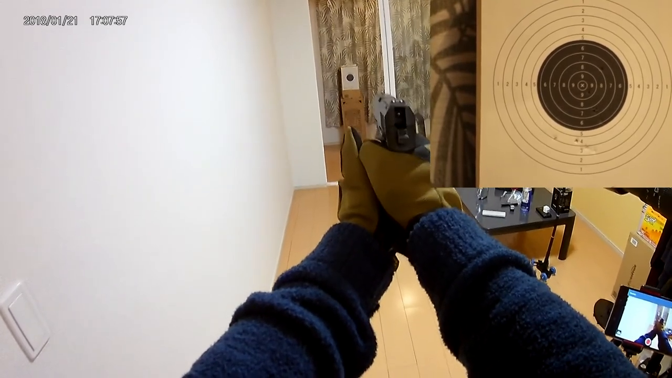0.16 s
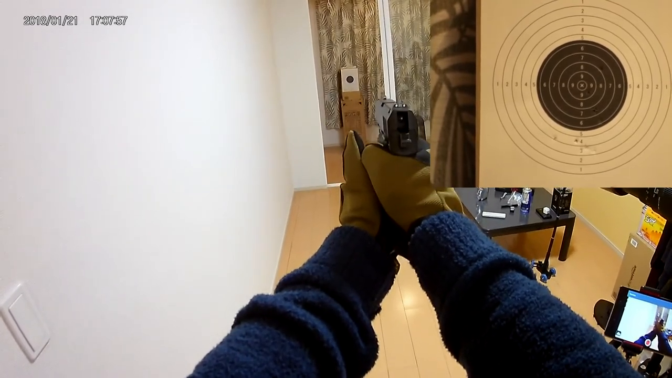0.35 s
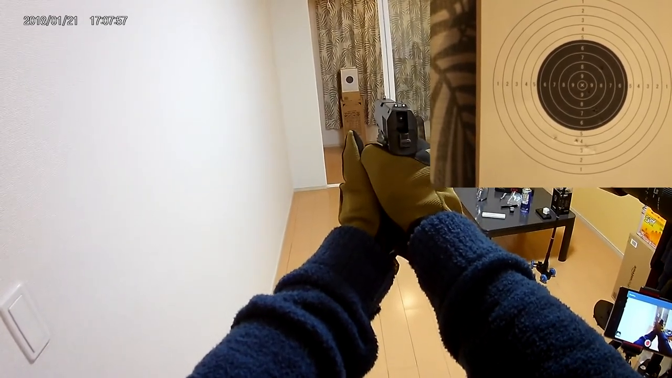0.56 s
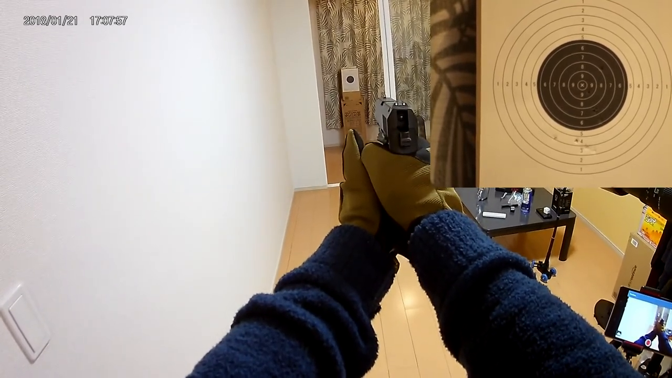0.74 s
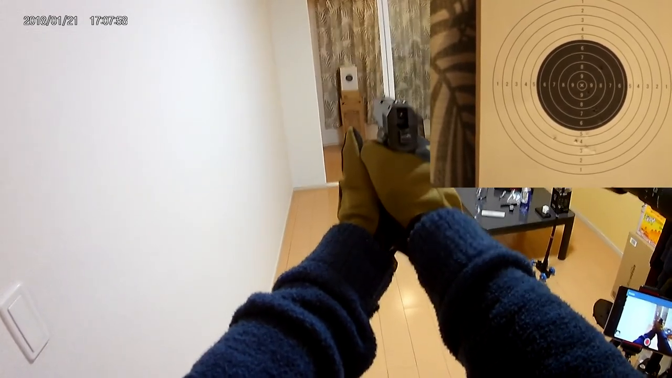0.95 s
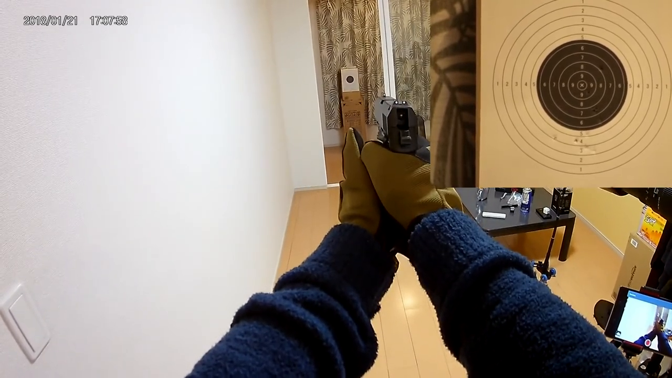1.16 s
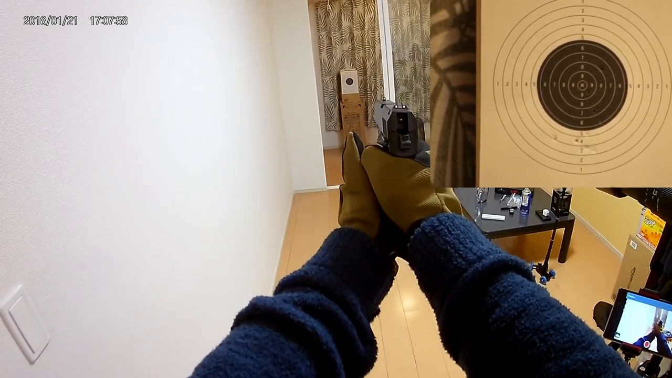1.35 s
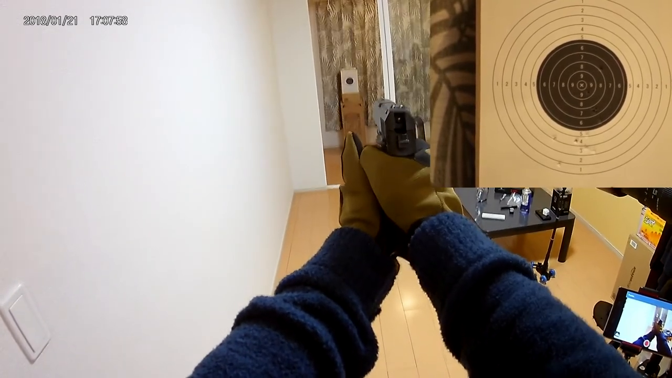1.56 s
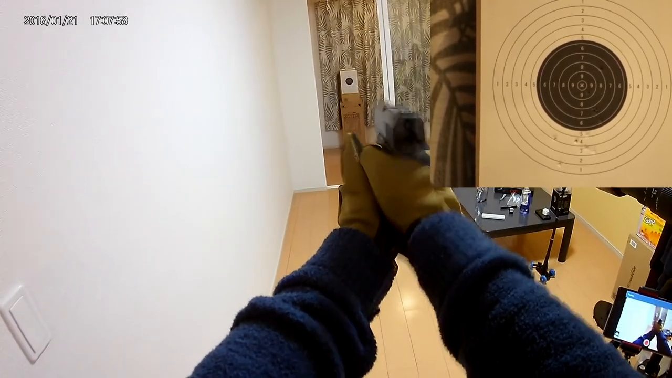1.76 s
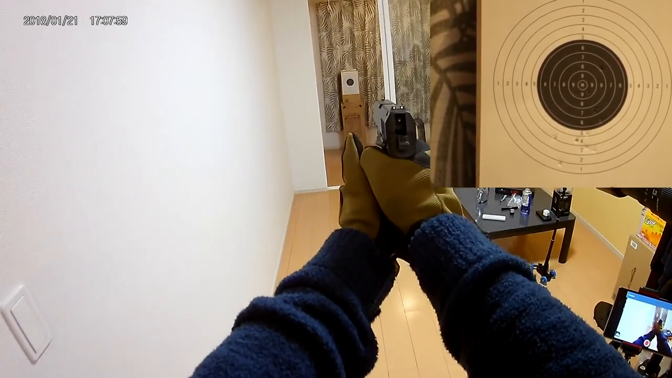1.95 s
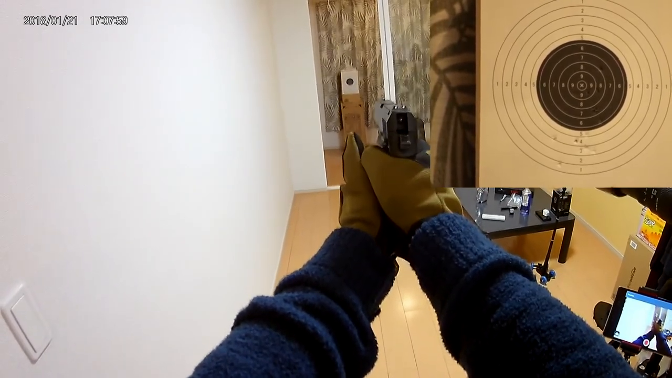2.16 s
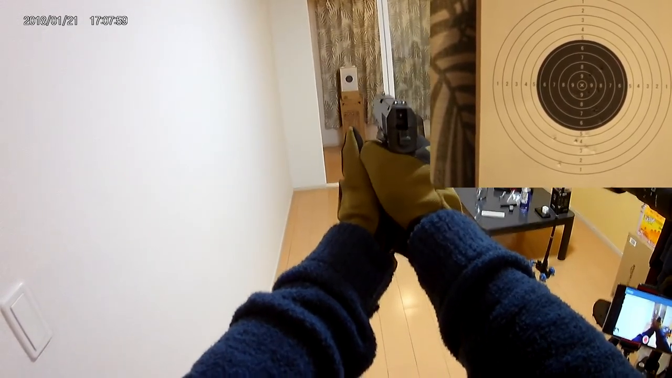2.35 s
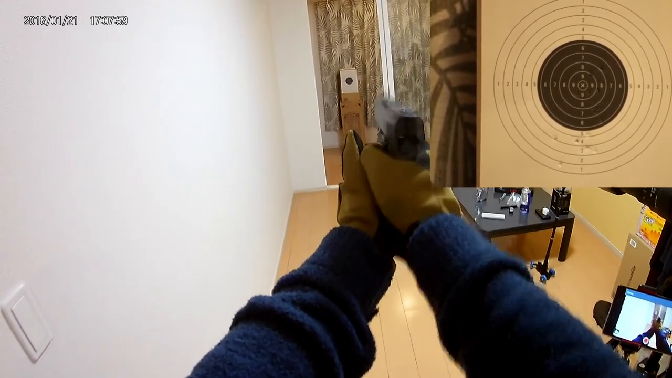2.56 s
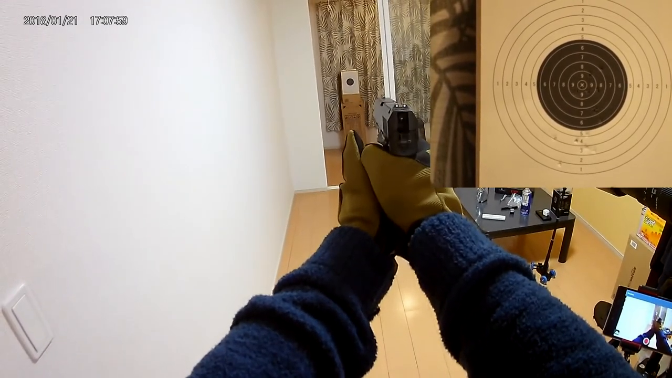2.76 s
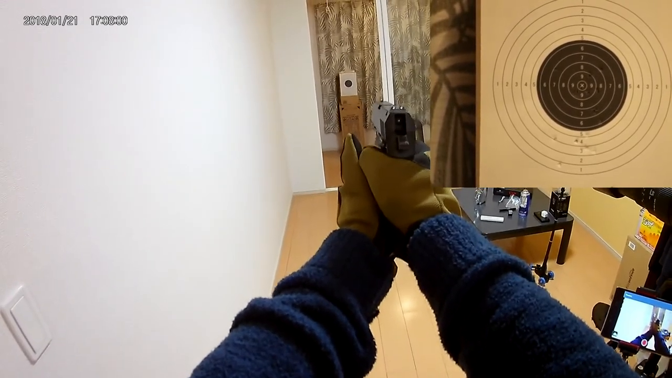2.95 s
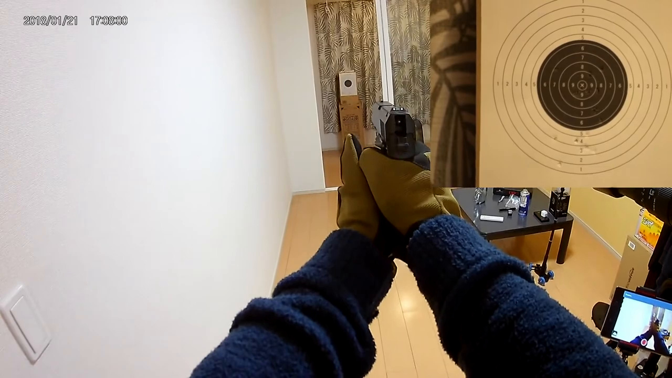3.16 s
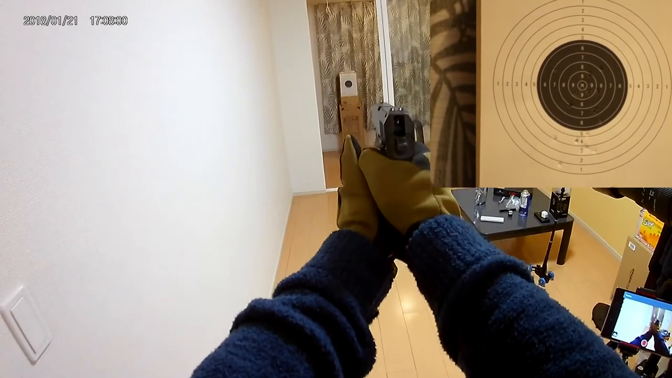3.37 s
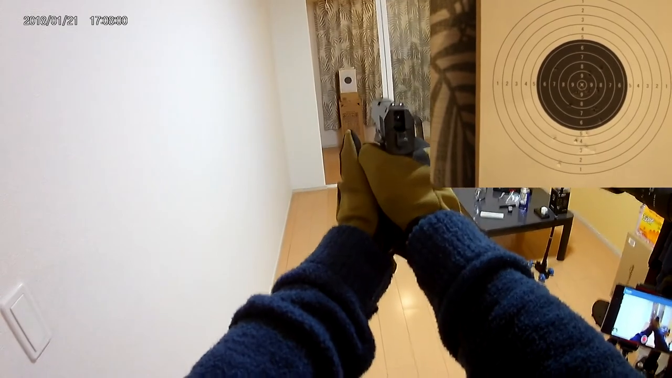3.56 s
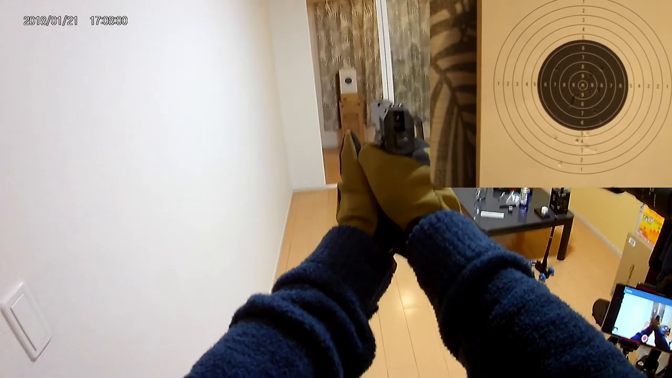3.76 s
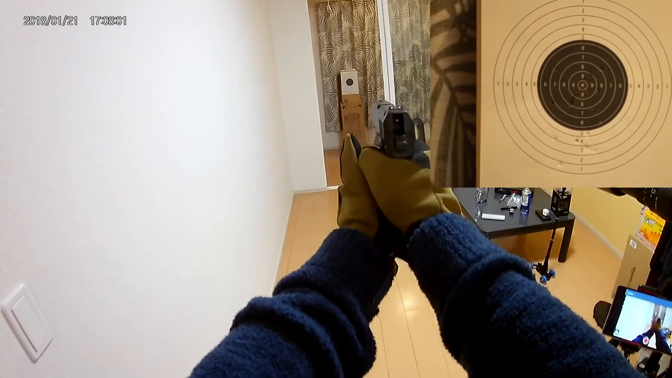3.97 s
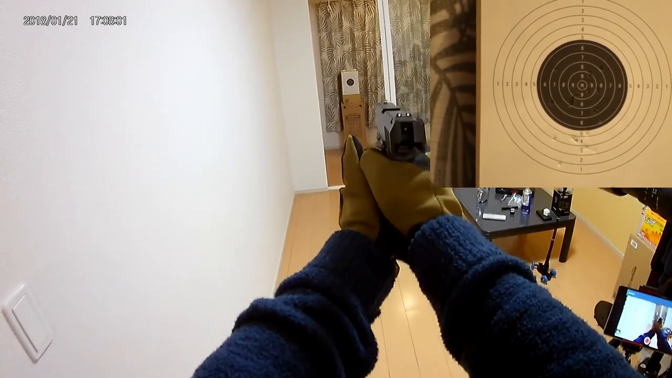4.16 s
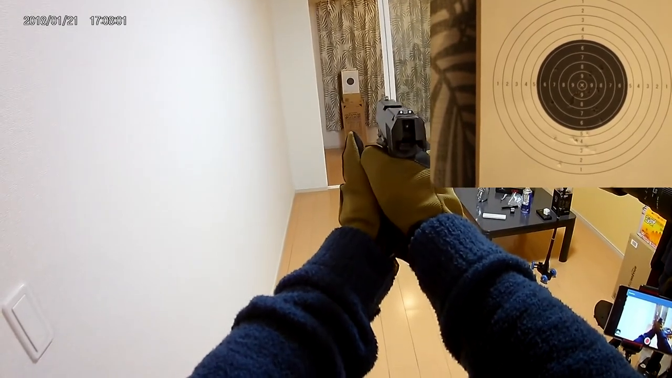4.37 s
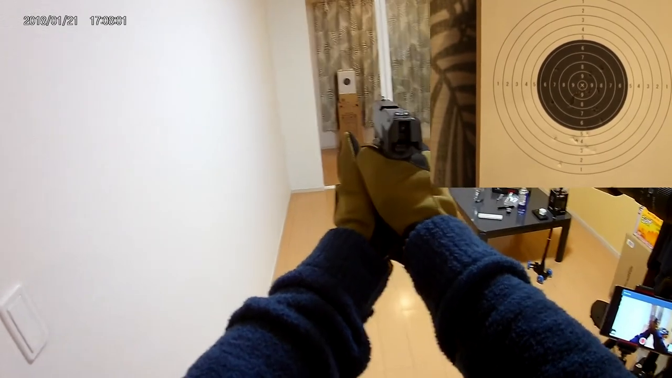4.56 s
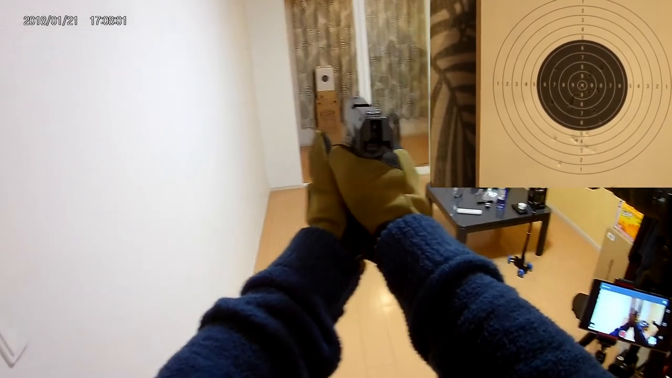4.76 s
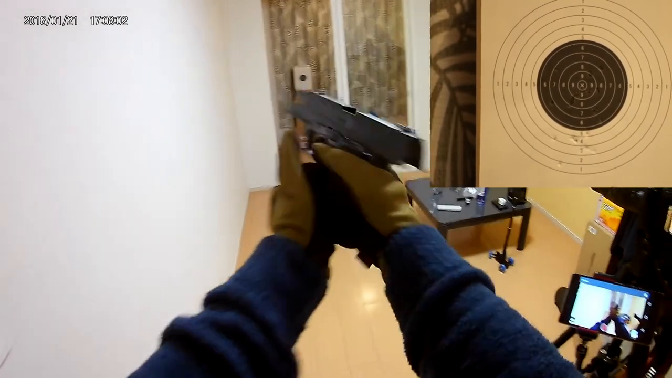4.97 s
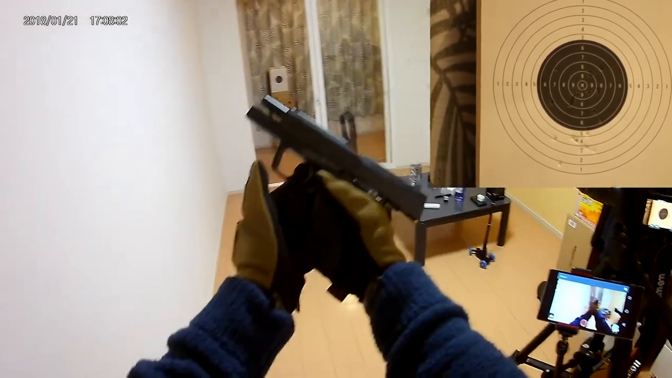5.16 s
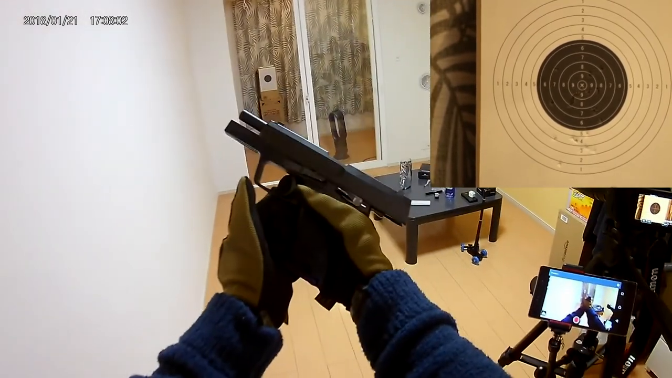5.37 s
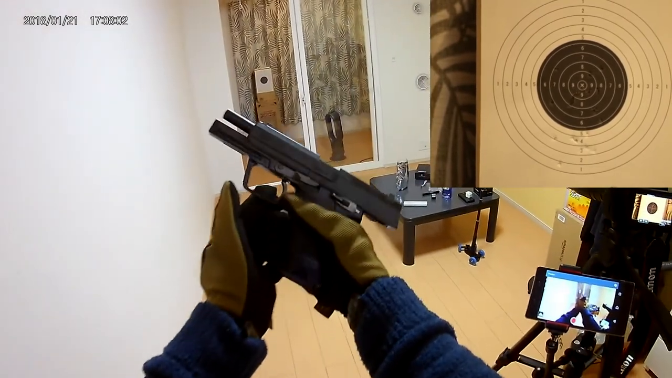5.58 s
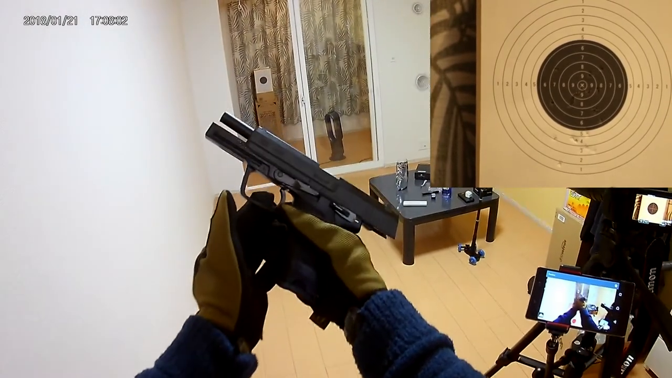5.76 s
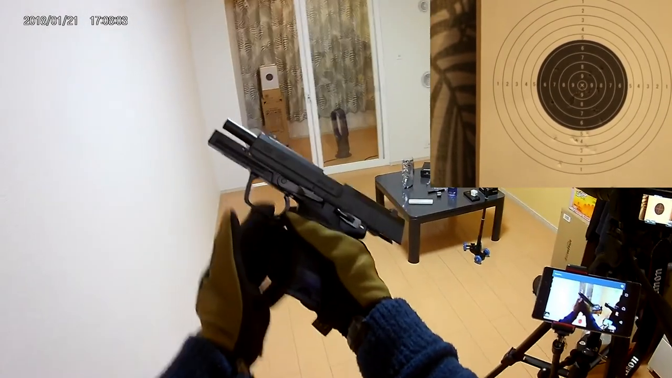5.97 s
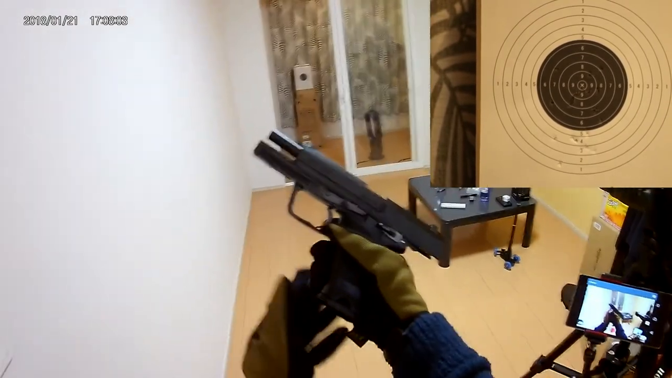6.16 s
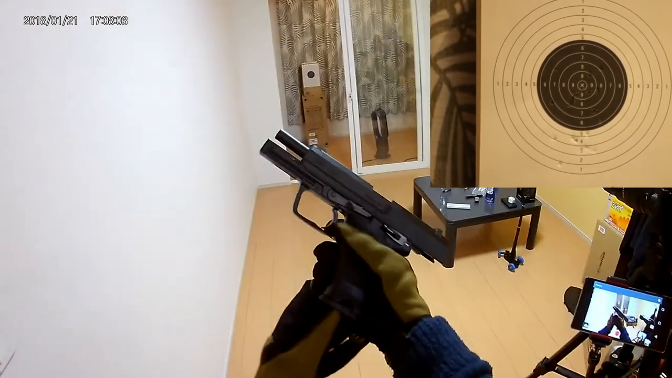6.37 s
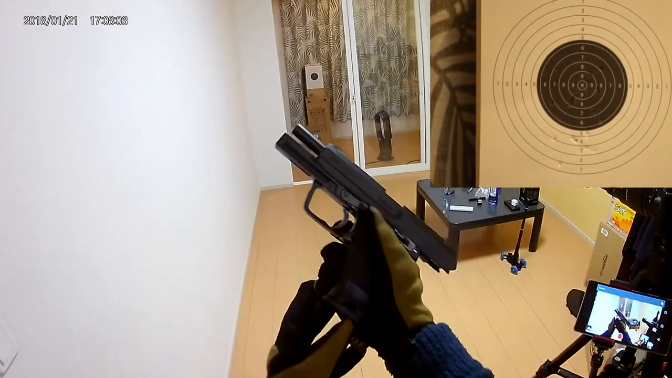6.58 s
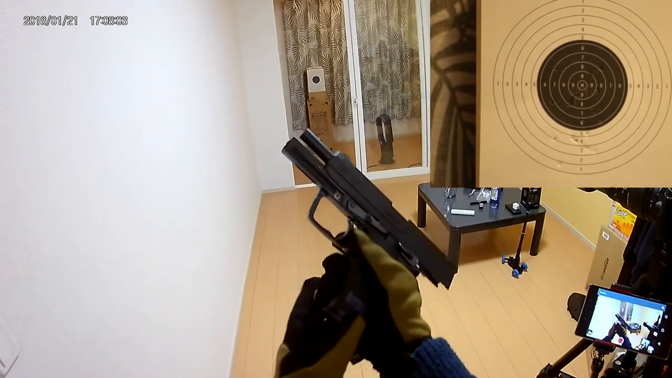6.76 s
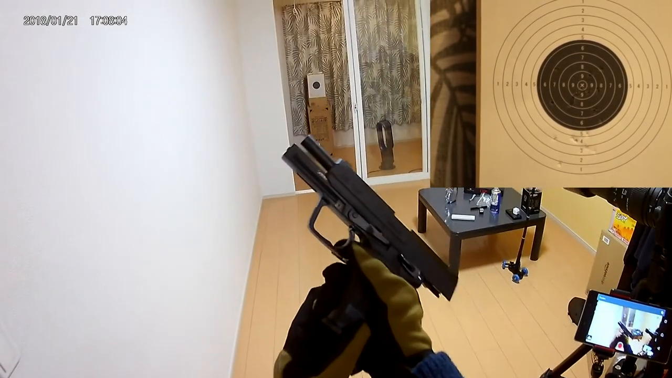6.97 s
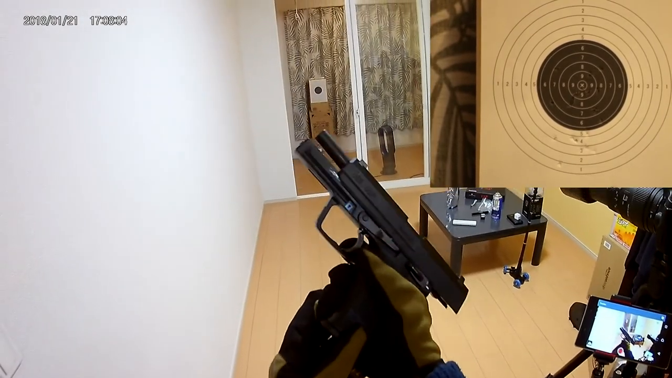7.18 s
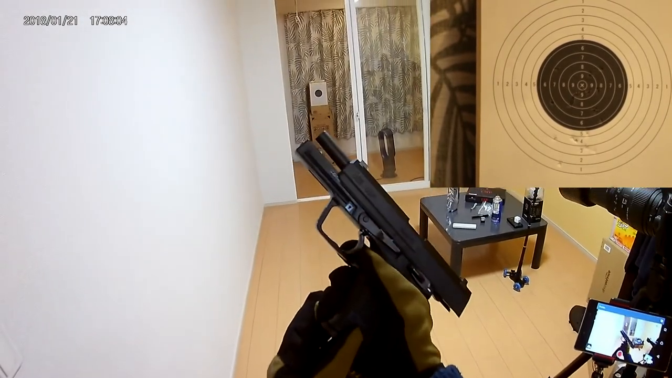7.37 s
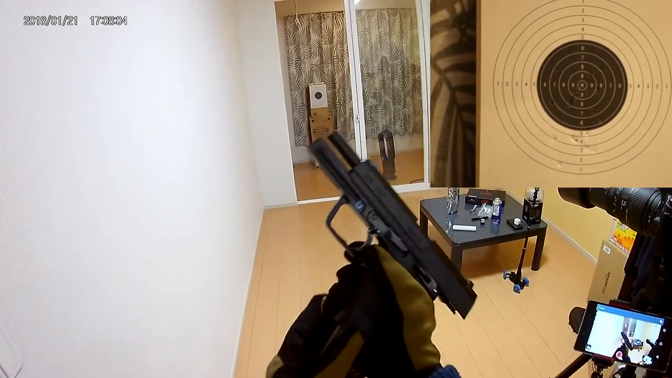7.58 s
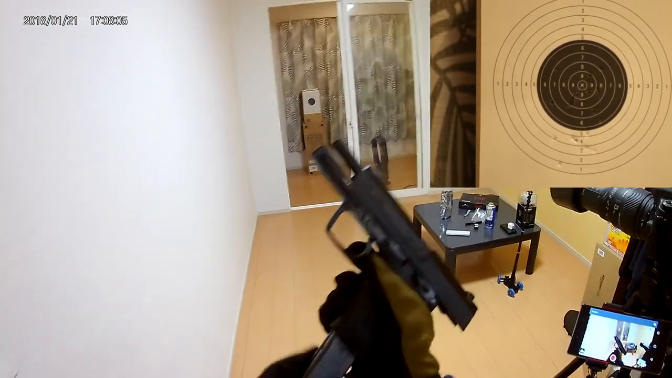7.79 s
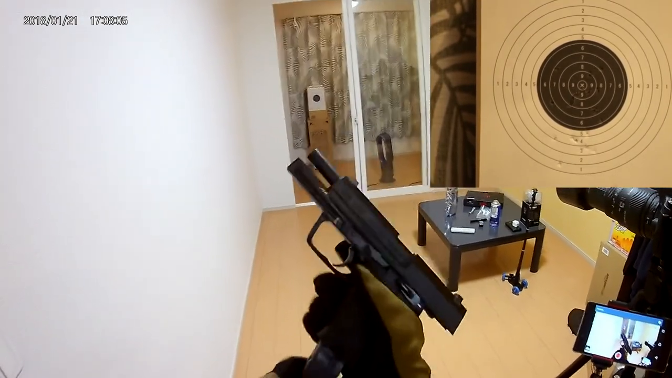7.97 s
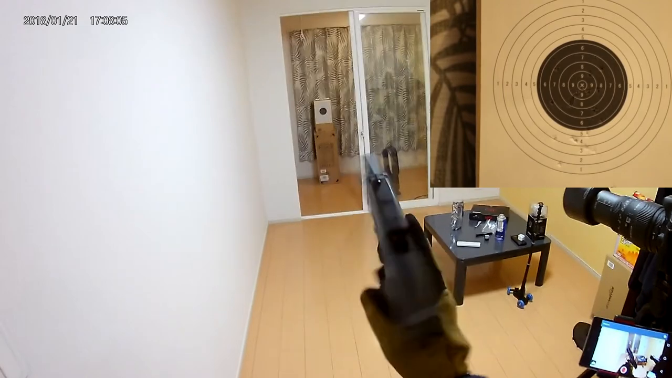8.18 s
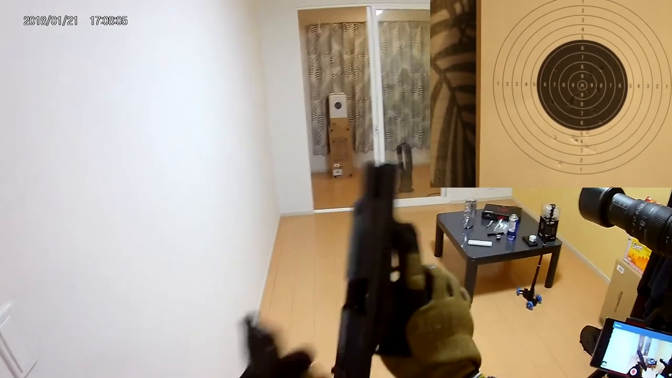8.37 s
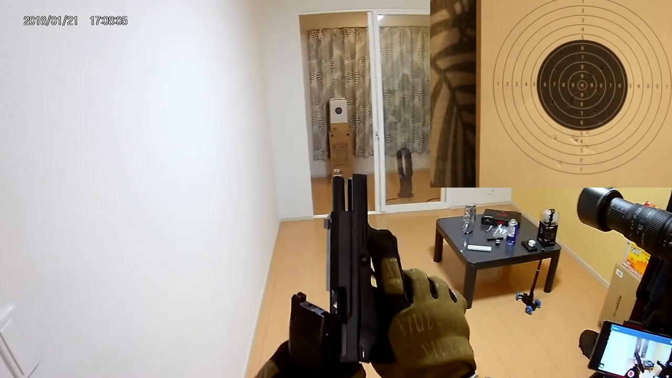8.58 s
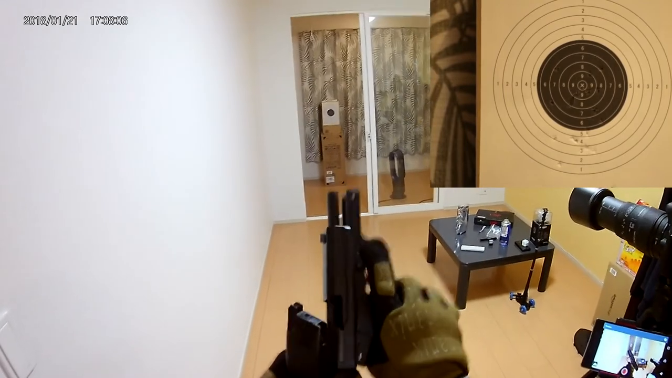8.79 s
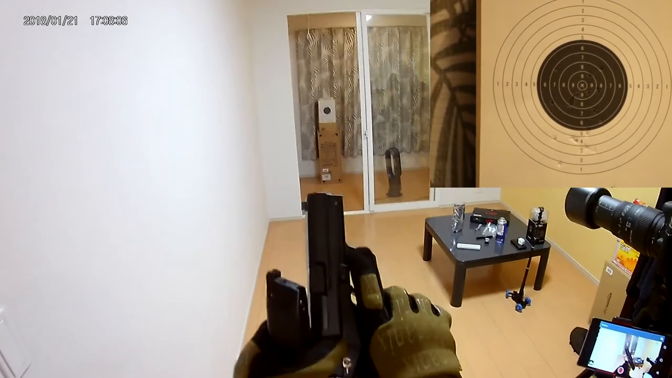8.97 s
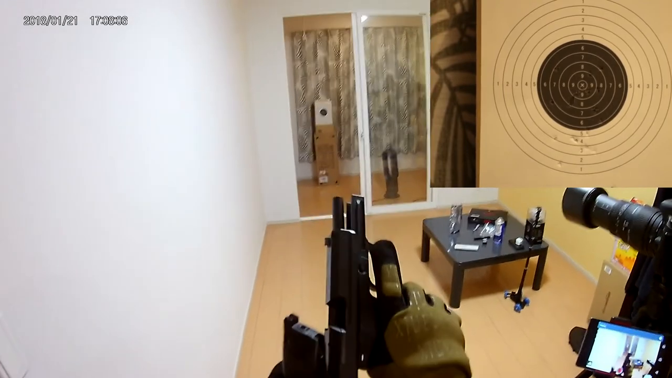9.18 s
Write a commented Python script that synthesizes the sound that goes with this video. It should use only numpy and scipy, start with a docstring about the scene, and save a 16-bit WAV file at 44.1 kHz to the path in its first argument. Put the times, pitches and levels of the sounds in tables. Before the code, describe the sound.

A gas airsoft pistol is fired close to a head-worn stereo microphone in a small, bare, reverberant room. The tail of a shot opens the sound; others crack at 0.2 and 0.9 s, with faint knocks and clicks between. From 1.6 to 4.2 s, eleven more follow quickly, roughly every quarter to third of a second. Each is a hard, bright gas burst with a low thump, double metallic slide clack, brief ring and boxy pellet smack; the box rattles around 1.7 s. The last slide stroke is softer. Reverberation fades to quiet air, hum and whir, with a click at 4.5 s. From 5.1 to 8.6 s come gentle glove and sleeve rustles, dull hollow knocks and small clicks, busiest near 7.5-8.2 s. Sharp ringing snaps sound close left at 8.75 and 9.05 s, then a scrape and the strongest snap at 9.2 s.

```python
"""A gas blowback airsoft pistol is fired fourteen times in a small, bare room, close to a head-worn stereo microphone.
Each shot is metal contacts, a shaped noise burst for the gas, a ringing slide and the pellet's smack on the target.
Among and after the shots come dull knocks and soft clicks, then the filtered-noise rustle of gloves and sleeves.
At the end the empty pistol is handled close by, with sharp ringing snaps and scrapes.
Still air, hum and whir lie underneath; a compressor turns loud sounds down and what is still too loud clips."""
import sys
import numpy as np
from scipy import signal
from scipy.fft import rfft, irfft, next_fast_len
from scipy.io import wavfile
from scipy.ndimage import uniform_filter1d

SR = 44100
rng = np.random.default_rng(int(sys.argv[2]) if len(sys.argv) > 2 else 0)


def transcribe(u):
    """Save the signal u as a 16-bit wav file named by the first command-line argument.

    u: samples, shape (n,) or (channels, n), limited to [-1, 1]; the rate is SR.
    q: integer samples, one column per channel.
    """
    v = np.clip(np.atleast_2d(u).T, -1, 1)
    q = np.round(v * 32767).astype(np.int16)
    wavfile.write(sys.argv[1], SR, q)


N = 407043
LEAD_IN = SR // 4  # samples worked out before time zero, cut off at the end
TIME = np.arange(-LEAD_IN, N) / SR  # seconds

# The shots; levels are relative within each layer:
# start_s [s], gas_db [dB], slide_pitch_hz [Hz], slide_ring_db [dB], target_db [dB]
SHOTS = [(-0.058, 6, 3490, -2, -2.5), (0.182, 6.5, 7350, -1, -3), (0.913, 4.5, 4750, 2, -2.5),
         (1.596, 8.5, 7580, 1, 6), (1.850, 8.5, 3270, -4, -1.5), (2.097, 8, 7740, -0.5, -1),
         (2.320, 7.5, 7120, -0.5, -2), (2.636, 7, 5260, -4, -1), (2.884, 9, 6595, -0.5, -5.5),
         (3.287, 7.5, 3530, -7, -1), (3.523, 8, 7020, -3.5, -3), (3.745, 9, 6200, 2.5, -0.5),
         (3.967, 7.5, 5860, -4.5, 0), (4.169, 7.5, 4170, -8, 1)]
# Standing waves of the room: pitch_hz [Hz], t60_s [s to fade by 60 dB], level_db [dB, relative]
ROOM_MODES = [(90.5, 0.46, -63), (167.9, 0.57, -54.5), (231, 0.95, -63), (338.5, 0.57, -53),
              (370.6, 0.83, -61.5), (381.5, 0.71, -63.5), (671, 0.98, -62), (912, .35, -57.5),
              (1180, 0.5, -59.5)]


def from_db(db):
    """Turn decibels into a gain."""
    return 10 ** (np.asarray(db) / 20)


def rms_one(x):
    """Scale to an rms (average strength) of one."""
    return x / np.sqrt(np.mean(x ** 2) + 1e-20)


def at_hz(points, hz):
    """Read a table between its points, on a logarithmic frequency axis."""
    f, value = np.transpose(points)
    return np.interp(np.log(np.maximum(hz, 1)), np.log(f), value)


def convolve(x, response):
    """Let every sample of every channel set off the response."""
    return signal.oaconvolve(np.atleast_2d(x), np.atleast_2d(response), axes=1)[:, :len(TIME)]


def colour(x, spectrum, size=4096):
    """Give a sound the spectrum's shape, with a filter of unit energy that acts as early as possible."""
    gain = from_db(at_hz(spectrum, np.fft.rfftfreq(size, 1 / SR)))
    # keeping only the first half of the cepstrum makes the filter minimum-phase
    cepstrum = irfft(np.log(gain))
    response = irfft(np.exp(rfft(2 * cepstrum[:size // 2], size)))
    return convolve(x, response / np.linalg.norm(response))


def resonance(x, hz, width_hz):
    """Strengthen one pitch: a two-pole resonance with gain 1 at its top."""
    r = np.exp(-np.pi * width_hz / SR)
    top = np.array([1, 0, -1]) * (1 - r * r) / 2
    return signal.lfilter(top, [1, -2 * r * np.cos(2 * np.pi * hz / SR), r * r], x)


def double_resonance(x, hz, width_hz):
    """Two equal resonances in a row let less of the other pitches through."""
    return resonance(resonance(x, hz, width_hz), hz, width_hz)


def burst(db, decay_s, size=4096):
    """A dying puff of noise with a nearly even spectrum; db is its energy spread over a hundredth of a second."""
    fade = np.exp(-np.arange(size) / (SR * max(decay_s, 1e-4)))
    spectrum = rfft(rng.standard_normal(size) * fade)
    puff = irfft(spectrum / np.abs(spectrum)) * np.sqrt(fade)
    return from_db(db) * puff / np.linalg.norm(puff) * np.sqrt(SR / 100)


def place(sounds):
    """Lay (start_s, sound) pairs on the time line."""
    out = np.zeros(len(TIME) + SR)
    for s, sound in sounds:
        start = LEAD_IN + round(s * SR)
        out[start:start + len(sound)] += sound
    return out[:len(TIME)]


def bursts(rows, spectrum):
    """Coloured puffs from rows of start_s, level_db, decay_s."""
    return colour(place((s, burst(db, decay_s)) for s, db, decay_s in rows), spectrum)


def contacts(rows, spectrum, decay_s, gain_db, width_hz, overtone, overtone_db):
    """Small impacts: a crack, and two ringing modes of the part that is struck."""
    sounds = []
    for s, db, hz, ring_db in rows:
        crack = burst(db + gain_db, decay_s)
        low_mode = resonance(crack, hz, width_hz)
        high_mode = from_db(overtone_db) * resonance(crack, hz * overtone, width_hz)
        sounds.append((s, crack + from_db(ring_db) * (low_mode + high_mode)))
    return colour(place(sounds), spectrum)


def swells(rows, release_s):
    """Gain of movements (peak_s, level_db, rise_s): each builds to its height and dies away."""
    gain = 0
    for s, db, rise_s in rows:
        distance = np.maximum((s - TIME) / rise_s, (TIME - s) / release_s)
        gain = gain + from_db(db) * np.exp(-distance.clip(0, 20))
    return gain


def friction(pressure, spectrum, grain_db, catch_db, catches_per_s=70, count=200):
    """Rubbing: noise that swells and slips every few milliseconds, with tiny ticks where it catches."""
    knots = TIME[::count]
    grain = np.interp(TIME, knots, rng.standard_normal(len(knots)))
    catches = (rng.random(len(TIME)) < catches_per_s / SR) * rng.standard_normal(len(TIME))
    rubbing = rng.standard_normal(len(TIME)) + from_db(catch_db) * catches
    return colour(pressure * from_db(grain_db * grain) * rubbing, spectrum)


def diffuse_noise(size):
    """Stereo noise from all sides, its two channels alike or unlike by pitch."""
    # Likeness of the two channels: pitch_hz [Hz], correlation [-1 to 1]
    likeness = [(30, 0.21), (130, .55), (300, 0.93), (700, 0.73), (1200, 0.26), (2200, -0.0034),
                (4000, 0.14), (15000, -0.15)]
    alike = np.clip(at_hz(likeness, np.fft.rfftfreq(size, 1 / SR)), -1, 1)
    mid, side = rfft(rng.standard_normal((2, size)))
    return irfft(np.sqrt(1 + alike) * mid + np.sqrt(1 - alike) * side * [[1], [-1]], size)


def room_response(late_db=-24, late_t60_s=1.72, late_top_hz=3500, build_s=0.0024, size=65536):
    """Echoes from one spot: a diffuse tail that dies by band, and a faint long one from the rooms beyond."""
    # Reverberation of the room: pitch_hz [Hz], t60_s [s to fade by 60 dB]
    room_t60 = [(60, 0.26), (130, 0.32), (250, 0.46), (700, 0.39), (2000, 0.52), (5000, 0.52), (8000, 0.41),
                (14000, 0.22)]
    hz, t, cells = signal.stft(diffuse_noise(size), SR, nperseg=256)
    near = from_db(-60 * t / at_hz(room_t60, hz)[:, None])
    fade = from_db(-60 * t / late_t60_s)
    beyond = from_db(late_db) * fade / (1 + (hz[:, None] / late_top_hz) ** 4)
    tail = rfft(signal.istft(cells * np.hypot(near, beyond), SR)[1][:, :size])
    # a diffuse field holds the same energy in every narrow band
    band_energy = uniform_filter1d(np.mean(np.abs(tail) ** 2, axis=0), size=64)
    tail = irfft(tail / np.sqrt(band_energy))[:, :size * 3 // 4]
    return tail * (1 - np.exp(-(TIME[LEAD_IN:][:tail.shape[1]] / build_s) ** 2))


def ringing(modes, size=49152):
    """Response of standing waves: each is a sine that dies away at its own pace."""
    t = np.arange(size) / SR
    return sum(from_db(db - 60 * t / t60_s) * np.sin(2 * np.pi * hz * t) for hz, t60_s, db in modes)


def heard(x, room, direct_db, room_db, pan_db=0, lag_samples=0):
    """The direct sound, later on the right by the lag and louder on the left by pan_db, and its reverberation."""
    left = x[0] * from_db(pan_db / 2)
    right = np.interp(TIME - lag_samples / SR, TIME, x[0]) * from_db(-pan_db / 2)
    return from_db(direct_db) * np.vstack([left, right]) + from_db(room_db) * convolve(x, room)


def room_tone(air_gain_db=-56, hum_hz=300, hum_db=-57.5):
    """Still air as shaped noise, with the hum (a sine) and whir (narrow noise bands) of appliances."""
    # Spectrum of the air: pitch_hz [Hz], level_db [dB per Hz, relative]
    air_spectrum = [(12, -42.5), (20, -9.5), (49, -10), (98, -11), (157, -8.5), (245, -12), (297, -6),
                    (371, -12.5), (666, -14.5), (957, -25.5), (1230, -18), (1490, -24.5), (11100, -33.5),
                    (12000, -46), (15500, -45)]
    # Whir of appliances: pitch_hz [Hz], width_hz [Hz], level_db [dB rms]
    whir_bands = [(300, 5.7, -60.5), (337, 8, -64), (12200, 150, -80)]
    air, fans = (diffuse_noise(next_fast_len(len(TIME)))[:, :len(TIME)] for _ in range(2))
    whir = sum(from_db(db) * rms_one(resonance(fans, hz, width_hz)) for hz, width_hz, db in whir_bands)
    hum = from_db(hum_db) * np.sqrt(2) * np.sin(2 * np.pi * hum_hz * TIME)
    return from_db(air_gain_db) * colour(air, air_spectrum) + whir + hum


def gas_blast(gas_decay_s=.016, pop_decay_s=.006, thump_decay_s=0.019, pop_db=-9, thump_db=-14):
    """Gas bursts from the muzzle as shaped noise, with a short pop and a low thump."""
    # Spectra of the gas, its pop and its thump: pitch_hz [Hz], level_db [dB per Hz, relative]
    gas_spectrum = [(40, -23.5), (200, -15.5), (500, -10), (900, 1.5), (1600, -1), (3000, 0), (5500, 2.5),
                    (7500, -1), (10000, -5), (15000, -14)]
    pop_spectrum = [(40, -13), (120, -11), (300, 0.5), (500, -3), (800, 1), (1500, -11), (4000, -31),
                    (15000, -56.5)]
    thump_spectrum = [(20, -2.5), (45, -6.5), (100, -9), (170, -2.5), (280, -2.5), (370, 1.5), (600, -10.5),
                      (2000, -40.5), (15000, -68)]
    follow = .45  # dB of pop and thump per dB of gas blast
    gas = bursts([(s, db, gas_decay_s) for s, db, *_ in SHOTS], gas_spectrum)
    pop = bursts([(s, follow * db + pop_db, pop_decay_s) for s, db, *_ in SHOTS], pop_spectrum)
    thump = bursts([(s, follow * db + thump_db, thump_decay_s) for s, db, *_ in SHOTS], thump_spectrum)
    room = room_response() + ringing(ROOM_MODES)
    out = heard(gas + thump, room, direct_db=-5.5, room_db=1.5, pan_db=7.0, lag_samples=8.2)
    return out + heard(pop, room_response(), direct_db=-1.5, room_db=-3.5, pan_db=2.5, lag_samples=8.4)


def spring(size=49152):
    """Response of the recoil spring, singing on after a stroke: its close modes beat against each other."""
    # Clusters of close modes: pitch_hz [Hz], width_hz [Hz], t60_s [s to fade by 60 dB], level_db [dB, relative]
    clusters = [(2185, 68, 1.3, -76), (3410, 120, 1.5, -71), (3830, 200, 1.5, -75.5), (4250, 90, 1.5, -77),
                (4700, 140, .9, -67.5)]
    t = np.arange(size) / SR
    response = 0
    for hz, width_hz, t60_s, db in clusters:
        modes = rms_one(double_resonance(rng.standard_normal((2, size)), hz, width_hz))
        response = response + modes * from_db(db - 60 * t / t60_s)
    return response


def slide_strokes(slide_db=0.26, locked_open_db=-4.5):
    """The gas throws the slide back and the spring drives it home: noise bursts as metal meets metal."""
    # Contacts of one cycle (sear, hammer, slide at its rear stop, pellet fed, slide home, rebound):
    # delay_s [s after the blast], level_db [dB, relative], decay_s [s]
    cycle = [(-0.008, -27.5, .002), (-0.0035, -10.5, 0.0022), (0.014, 2.5, 0.0072), (0.052, -5.5, 0.0022),
             (0.072, 0, 0.0016), (0.096, -8.5, 0.0072)]
    # Spectrum of the metal: pitch_hz [Hz], level_db [dB per Hz, relative]
    metal_spectrum = [(50, -32.5), (400, -11.5), (1000, 1.5), (1700, 0), (2300, 2.5), (3500, 0), (5000, -1),
                      (7000, -1), (10000, -4.5), (15000, -13)]
    # every stroke is alike, but after the last pellet the slide is caught open and its contacts are softer
    strokes = [(s, slide_db + locked_open_db * (s == SHOTS[-1][0])) for s, *_ in SHOTS]
    out = 0
    # alternate contacts of the cycle (sear, rear stop, home; hammer, pellet fed, rebound) light up the room
    # from two different spots
    for group in (cycle[::2], cycle[1::2]):
        rows = [(s + delay_s, stroke_db + db, decay_s) for s, stroke_db in strokes for delay_s, db, decay_s in group]
        slide = bursts(rows, metal_spectrum)
        room = room_response() + spring()
        out = out + heard(slide, room, direct_db=-6.5, room_db=1.5, pan_db=4.0, lag_samples=7.5)
    return out


def slide_rings(width_hz=550, decay_s=.025, gain_db=12):
    """Every stroke favours another resonance of the slide, set off by a noise burst."""
    rings = place((s, double_resonance(burst(db + gain_db, decay_s), hz, width_hz)) for s, _, hz, db, _ in SHOTS)
    return heard(rings[None], room_response(), direct_db=-2.5, room_db=7.5, pan_db=-3.0, lag_samples=11.0)


def target(smack_decay_s=0.0075, pellet_flight_s=.083):
    """Each pellet smacks into the target box, which sometimes rattles: short bursts of boxy noise."""
    # Rattles of the box after a hit: start_s [s], level_db [dB, relative], decay_s [s]
    rattles = [(1.697, -10.5, .02), (1.720, -13, 0.02), (1.745, -6, 0.026), (3.873, -19.5, .004),
               (4.413, -20.5, .003)]
    # Spectrum of the box: pitch_hz [Hz], level_db [dB per Hz, relative]
    target_spectrum = [(40, -15.5), (170, -21), (500, -0.5), (900, 4), (1300, 4.5), (2000, -1),
                       (5000, -15.5), (15000, -31)]
    smacks = [(s + pellet_flight_s, db, smack_decay_s) for s, *_, db in SHOTS]
    room = room_response() + ringing(ROOM_MODES)
    return heard(bursts(smacks + rattles, target_spectrum), room, direct_db=-5, room_db=-6.0)


def far_knocks(boom_hz=530, boom_width_hz=130, boom_db=-2, boom_decay_s=0.025):
    """Dull knocks from across the room, each followed by a short hollow boom."""
    # Knocks: start_s [s], level_db [dB, relative], pitch_hz [Hz], ring_db [dB against the crack]
    knock_rows = [(0.663, -25.5, 2274, -15), (1.33, -38, 1160, -1), (5.265, -29, 1300, -2),
                  (5.43, -26, 1200, -24), (5.806, -28, 2020, -6.5), (5.991, -27, 1220, -17),
                  (6.734, -27, 1180, -18), (6.931, -37.5, 2730, 1), (7.52, -37, 1345, 1),
                  (7.583, -28, 2020, -8)]
    # Spectrum of a knock: pitch_hz [Hz], level_db [dB per Hz, relative]
    knock_spectrum = [(60, -28), (330, -9.5), (520, -3.5), (720, -5.5), (1000, -3), (1220, -1.5),
                      (1650, -4.5), (2030, -0.5), (2450, -7), (2780, -7.5), (3350, -7.5), (4800, -13),
                      (8000, -24), (15000, -39)]
    knocks = contacts(knock_rows, knock_spectrum, decay_s=.0044, gain_db=-6.5, width_hz=220,
                      overtone=1.5, overtone_db=-2.5)
    # the boom starts 38 ms after its knock
    drive = place((s + .038, burst(db + boom_db, boom_decay_s)) for s, db, *_ in knock_rows)
    boom = double_resonance(drive, boom_hz, boom_width_hz)
    out = heard(knocks, room_response(), direct_db=-3.0, room_db=5.5)
    return out + heard(boom[None], room_response(), direct_db=10.0, room_db=14.5)


def clicks_and_cloth():
    """At arm's length, small ringing impacts click and rubbed noise rustles like glove and sleeve."""
    # Soft clicks of trigger, grip and magazine:
    # start_s [s], level_db [dB, relative], pitch_hz [Hz], ring_db [dB against the crack]
    click_rows = [(0.687, -15.5, 2180, -2), (0.882, -25.5, 1174, 11), (1.456, -35.5, 2124, 17),
                  (1.568, -24, 1440, 8), (4.526, -16.5, 1184, -2), (6.098, -34.5, 1136, 7.5),
                  (7.877, -20.5, 1020, -3), (7.898, -34, 3400, 12), (7.947, -43, 1020, 20),
                  (8.108, -32, 1353, 0), (8.132, -23, 1985, 4), (8.153, -29.5, 3600, 14),
                  (8.203, -40, 1400, 15), (8.837, -28, 1360, 4)]
    # Arm movements: peak_s [s], level_db [dB, relative], rise_s [s]
    arm_moves = [(5.12, -53.5, .1), (5.66, -59, 0.058), (5.92, -56, .03), (6.19, -57, .09),
                 (6.87, -60, .03), (7.12, -66, 0.045), (7.73, -48, 0.048), (7.83, -49, 0.054),
                 (8.33, -53, 0.041), (8.61, -64.5, .03)]
    # Spectra of clicks and cloth: pitch_hz [Hz], level_db [dB per Hz, relative]
    click_spectrum = [(60, -28), (600, -5.5), (1000, -2), (2000, 2.5), (3400, -1.5), (5000, -8),
                      (9000, -18), (15000, -33.5)]
    cloth_spectrum = [(100, -13), (600, -0.5), (2000, 3.5), (4000, 0), (9000, -5), (15000, -20)]
    clicks = contacts(click_rows, click_spectrum, decay_s=.0036, gain_db=-13.0, width_hz=170,
                      overtone=1.7, overtone_db=-14.5)
    cloth = friction(swells(arm_moves, release_s=0.046), cloth_spectrum, grain_db=1.5, catch_db=16)
    return heard(clicks + cloth, room_response(), direct_db=0.0, room_db=6.5, pan_db=11.5, lag_samples=1.0)


def hollow_grip(width_hz=330, decay_s=0.026, gain_db=4):
    """The empty grip resounds as the hand closes round it: each shift is a noise burst at its own pitch."""
    # Shifts of the hand: start_s [s], pitch_hz [Hz], level_db [dB, relative]
    shifts = [(8.757, 1380, -13), (8.819, 1320, -19), (8.925, 1250, -20), (9.053, 1180, -7),
              (9.111, 1210, -13)]
    return place((s, double_resonance(burst(db + gain_db, decay_s), hz, width_hz)) for s, hz, db in shifts)


def close_snaps():
    """Close by on the left, slide and catch snap as ringing impacts and the slide scrapes along its rails."""
    # Sharp snaps: start_s [s], level_db [dB, relative], pitch_hz [Hz], ring_db [dB against the crack]
    snap_rows = [(8.752, -7, 3800, 9), (8.921, -20, 4140, 13), (9.042, -13, 2710, 6),
                 (9.051, -20, 2060, 18.5), (9.059, -14, 2920, 6), (9.124, -24, 2040, 0),
                 (9.169, -9, 3300, 10), (9.197, 4, 5500, -3), (9.202, -4, 5800, -8)]
    # Pushes of the slide, each building until it catches: peak_s [s], level_db [dB, relative], rise_s [s]
    pushes = [(9.0, -36, .07), (9.055, -28.5, 0.022), (9.2, -15, 0.016)]
    # Spectrum of snaps and scrapes: pitch_hz [Hz], level_db [dB per Hz, relative]
    snap_spectrum = [(60, -36), (550, -12), (950, -8.5), (1350, -1), (1750, -2.5), (2250, -2.5), (2850, -6),
                     (3900, -4.5), (5300, -4), (6500, -4), (10000, -9.5), (15000, -20.5)]
    snaps = contacts(snap_rows, snap_spectrum, decay_s=0.0026, gain_db=-13.5, width_hz=490,
                     overtone=1.3, overtone_db=-4.5)
    scrapes = friction(swells(pushes, release_s=0.018), snap_spectrum, grain_db=4, catch_db=26.5)
    room = room_response() * from_db([[1.2], [-1.2]])  # echoes also louder on the left
    return heard(snaps + scrapes + hollow_grip(), room, direct_db=-1.5, room_db=-0.5, pan_db=10.0, lag_samples=9.8)


def grip_jolt():
    """The grip jolts with the last snap: a short, low noise burst, the same on both sides."""
    # Jolts: start_s [s], level_db [dB], decay_s [s]
    jolts = [(9.197, -33.5, 0.0023)]
    # Spectrum of a jolt: pitch_hz [Hz], level_db [dB per Hz, relative]
    jolt_spectrum = [(25, 2), (60, 1), (130, 6), (250, -1), (500, -1), (2000, -43), (15000, -75.5)]
    return bursts(jolts, jolt_spectrum)


def scene():
    """Add up the still room, the shots, the target and the small sounds."""
    pistol = gas_blast() + slide_strokes() + slide_rings()
    handling = clicks_and_cloth() + close_snaps() + grip_jolt()
    return (room_tone() + pistol + target() + far_knocks() + handling)[:, LEAD_IN:]


def record(dry, threshold_db=-4, squeeze=0.19, release_db_per_s=150, attack_s=0.006, cutoff_hz=15700):
    """A fast compressor holds the shots down, what is still too loud clips hard, and the top is cut."""
    pole = np.exp(-1 / (attack_s * SR))
    power = signal.lfilter([1 - pole], [1, -pole], np.mean(dry ** 2, axis=0))
    level_db = 10 * np.log10(power + 1e-12)
    # the excess over the threshold jumps up at once but falls at a steady rate
    fall = release_db_per_s * np.arange(N) / SR
    over_db = np.maximum.accumulate(np.maximum(level_db - threshold_db, 0) + fall) - fall
    clipped = np.clip(dry * from_db(-squeeze * over_db), -1, 1)
    return signal.sosfilt(signal.ellip(10, .1, 70, cutoff_hz, fs=SR, output="sos"), clipped)


dry = scene()
out = record(dry)
transcribe(out)
```